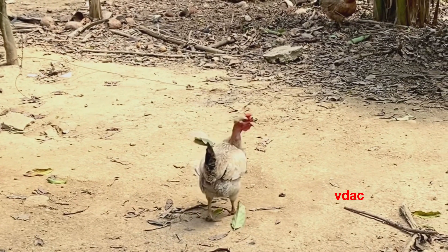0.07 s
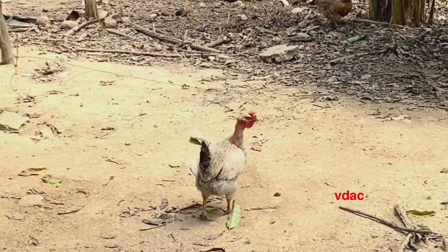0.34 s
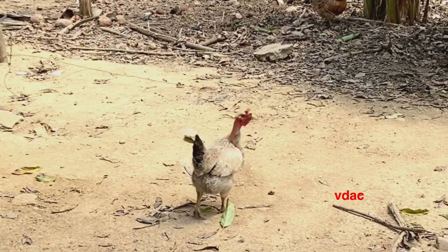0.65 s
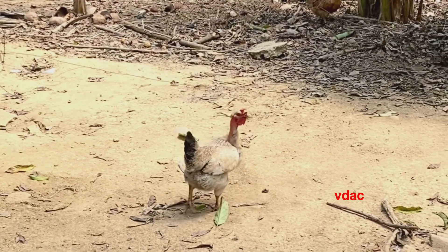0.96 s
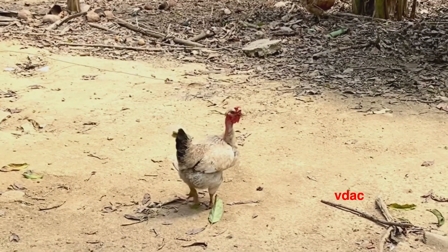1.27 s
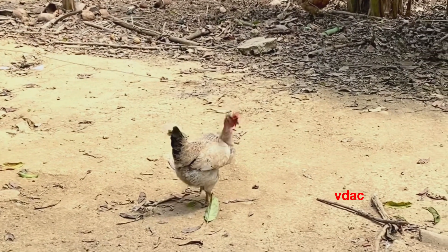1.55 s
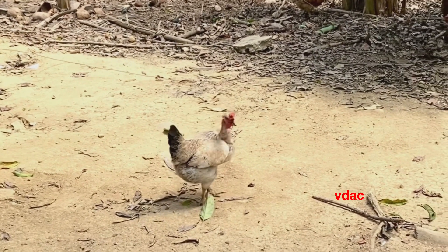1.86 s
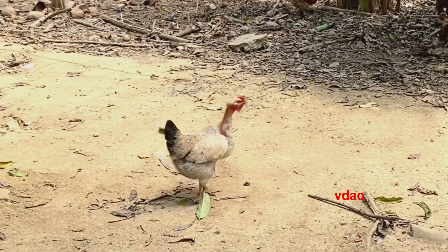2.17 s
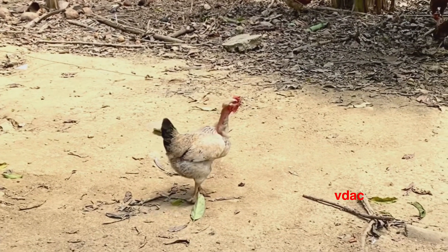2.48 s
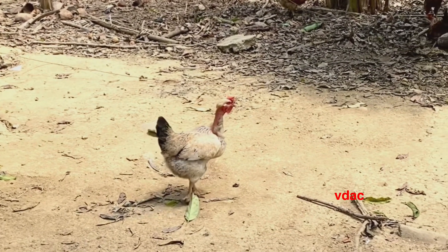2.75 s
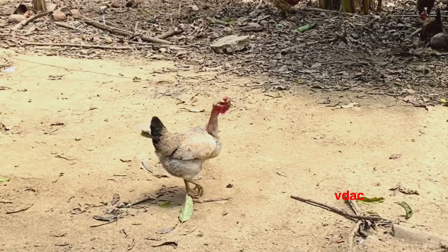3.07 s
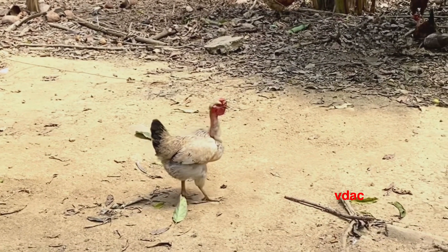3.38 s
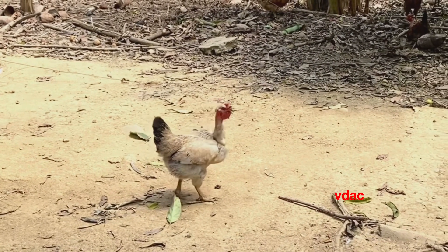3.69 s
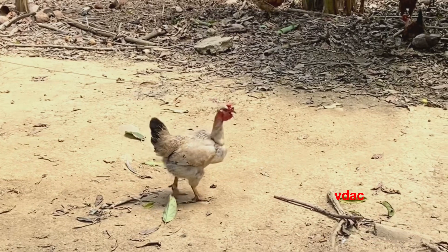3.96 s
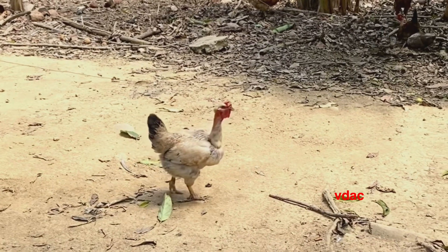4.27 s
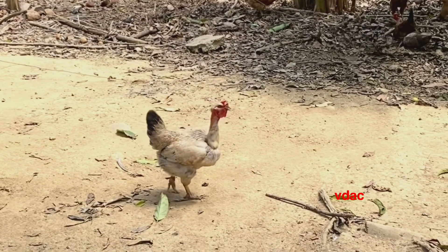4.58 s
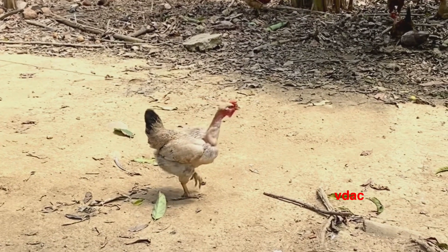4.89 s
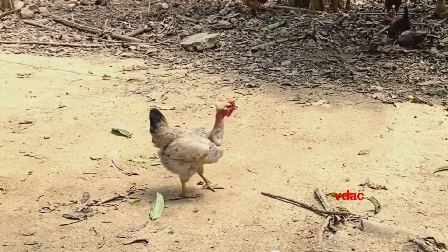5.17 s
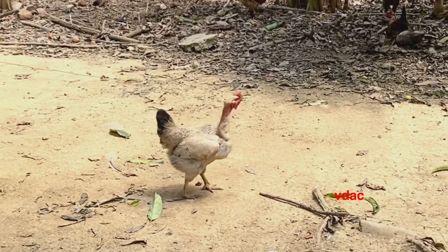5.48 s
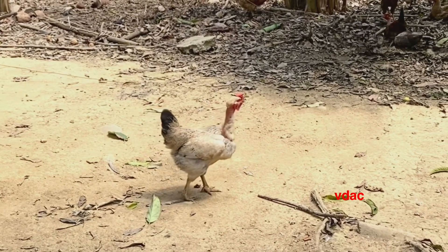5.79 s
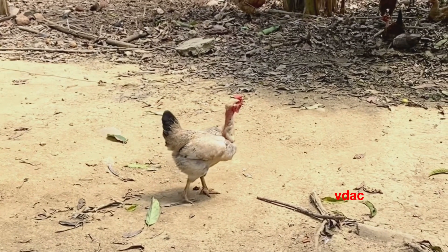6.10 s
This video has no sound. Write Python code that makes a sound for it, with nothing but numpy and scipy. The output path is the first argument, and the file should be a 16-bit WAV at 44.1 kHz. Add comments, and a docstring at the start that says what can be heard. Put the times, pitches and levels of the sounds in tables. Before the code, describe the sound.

A hen gives two loud squawks, a thin whine and a run of short clucks outdoors, with light wind on the microphone.

```python
"""A hen in a farmyard

A hen gives a rasping squawk, a run of clucks, a clear loud squawk, a thin whine and more clucks.
Each call is a pulse train from the syrinx, filtered by the throat, reflected by the hard ground and
scattered by trees. Other fowl mutter, small birds peep and a foot scuffs grit, while distant leaves
hiss and a light wind buffets the microphone."""
import sys
import numpy as np
from scipy import signal
from scipy.fft import rfft, irfft, next_fast_len
from scipy.io import wavfile
from scipy.ndimage import uniform_filter1d, map_coordinates

SR = 44100
rng = np.random.default_rng(int(sys.argv[2]) if len(sys.argv) > 2 else 0)


def master_out(mix):
    """Clip the mix to full scale and print it as 16-bit PCM to the path in sys.argv[1]."""
    frames = np.transpose(np.atleast_2d(mix))
    ceiling = np.clip(frames, -1, 1)
    pcm = np.round(ceiling * 32767).astype(np.int16)
    wavfile.write(sys.argv[1], SR, pcm)


N = 279594


def amp(db):
    """Decibels to amplitude ratio."""
    return 10 ** (np.asarray(db) / 20)

def unit(x):
    """Normalisation to rms 1."""
    return x / np.sqrt(np.mean(x ** 2) + 1e-20)

def along(points, hz):
    """Interpolation of (frequency [Hz], value) points on a logarithmic axis."""
    knots, values = np.transpose(points)
    return np.interp(np.log(hz + 1), np.log(knots + 1), values)

def curves(rows, t):
    """Linear interpolation in time of each column after the first."""
    times, *columns = np.transpose(rows)
    return [np.interp(t, times, column) for column in columns]

def wobble(rate, size):
    """Smooth random modulation: a spline through rate knots a second."""
    knots = rng.standard_normal(int(size * rate / SR) + 4)
    return map_coordinates(knots, [np.arange(size) * rate / SR])

def add(track, start, x):
    """Superposition of x on the track from start [s]."""
    part = track[max(0, round(start * SR)):][:len(x)]
    part += x[:len(part)]

def filtered(x, response):
    """Linear filtering: the spectrum times a complex frequency response."""
    n = x.shape[-1]
    padded = next_fast_len(n + 8192)
    return irfft(rfft(x, padded) * response(np.fft.rfftfreq(padded, 1 / SR)), padded)[..., :n]

def brighten(x, db, split_hz=1500):
    """High shelf: the treble above the split changes by db."""
    treble = filtered(x, lambda hz: 1 - 1 / (1 + (hz / split_hz) ** 8))
    return x + (amp(db) - 1) * treble

def stereo_noise(spectrum, coherence):
    """Partial coherence: the balance of mid and side noise sets how alike the channels are."""
    def response(hz):
        angle = np.arccos(np.clip(along(coherence, hz), -1, 1)) / 2
        return amp(along(spectrum, hz)) * [np.cos(angle), np.sin(angle)]
    mid, side = filtered(rng.standard_normal((2, N)), response)
    return unit(np.array([mid + side, mid - side]))

def foliage():
    """Incoherent sources: distant leaves merge into a nearly steady hiss."""
    # leaf noise (frequency [Hz], level [dB])
    spectrum = [(80, -23.5), (150, -7), (300, -14), (500, -10.5), (660, -13.5), (1100, -17.5),
                (2500, -23.5), (7000, -32.5), (8500, -40), (11000, -38), (13000, -55.5), (15500, -61.5)]
    # left-right likeness (frequency [Hz], coherence [0-1])
    coherence = [(60, 0.58), (150, 0.15), (380, 0.77), (950, 0.0), (2380, 0.56), (5980, 0.053),
                 (15000, 0.85)]
    return amp(-61.5 + .9 * wobble(4, N)) * stereo_noise(spectrum, coherence)

def wind(eddy_db=2.5, eddies_per_s=14):
    """Turbulent pressure: eddies and sudden puffs rumble on the microphone."""
    # breeze strength (time [s], relative level [dB])
    breeze = [(0.0, -59), (0.86, -64.5), (1.66, -49), (2.03, -52), (2.4, -59), (2.72, -61), (3.16, -62),
              (3.48, -54.5), (3.67, -64), (3.94, -67.5), (4.48, -63.5), (4.79, -58), (5.3, -63.5),
              (6.34, -58)]
    # puffs (time [s], half width [s], level [dB])
    bumps = [(1.498, 0.019, -24.5), (1.55, 0.02, -38.5), (1.725, 0.026, -41.5), (1.935, .02, -48),
             (2.03, .05, -45.5), (2.19, 0.048, -47.5), (2.75, 0.024, -44), (2.844, 0.019, -32.5),
             (3.244, 0.016, -39.5), (3.425, 0.032, -45.5), (3.575, 0.018, -42), (3.641, .018, -37),
             (4.55, 0.0098, -46), (5.66, 0.012, -46.5), (6.04, .012, -37)]
    # turbulence spectrum (frequency [Hz], level [dB])
    rumble = [(18, -44), (35, -13), (55, 1.5), (80, 1), (120, -3), (170, -6), (215, -13), (260, -17.5),
              (450, -41.5), (900, -89)]
    t = np.arange(N) / SR
    buffet = amp(curves(breeze, t)[0] + 2 + eddy_db * wobble(eddies_per_s, N))
    puffs = sum(amp(db) * np.exp(-((t - time) / width) ** 2) for time, width, db in bumps)
    return np.hypot(buffet, puffs) * stereo_noise(rumble, coherence=[(60, .78), (250, .83)])

def peeps():
    """Frequency glides: small birds whistle nearly pure tones."""
    # whistles (time [s], length [s], start pitch [Hz], end pitch [Hz], relative level [dB])
    notes = [(3.098, 0.12, 2580, 2870, -67), (3.364, 0.078, 2730, 2500, -63),
             (3.47, 0.069, 2485, 2623, -67), (3.584, 0.069, 2590, 2560, -64),
             (5.155, 0.075, 3780, 3713, -48), (5.506, 0.057, 3500, 4010, -59.5),
             (5.671, 0.056, 3990, 3890, -63), (6.071, 0.1215, 5330, 5330, -75)]
    out = np.zeros(N)
    for start, length, start_hz, end_hz, db in notes:
        progress = np.linspace(0, 1, int(length * SR))
        pitch = (start_hz + (end_hz - start_hz) * progress) * (1 + .0061 * wobble(150, len(progress)))
        arch = 2 * np.sqrt(progress * (1 - progress))
        add(out, start, amp(db) * arch * np.sin(2 * np.pi * np.cumsum(pitch) / SR))
    return out

def mutters():
    """Irregular voicing: other fowl give low, rough clucks with a slow onset."""
    # soft calls (time [s], length [s], pitch [Hz], relative level [dB])
    notes = [(0.302, 0.032, 190.9, -58), (.59, 0.025, 165.2, -57.5), (3.492, .025, 170, -61),
             (4.191, 0.043, 166.7, -55.5)]
    # throat response (frequency [Hz], gain [dB])
    colour = [(150, -12), (350, -6), (520, 9), (750, -8.5), (1200, -23), (2500, -21), (4000, -38.5),
              (10000, -47.5)]
    out = np.zeros(N)
    for start, length, pitch_hz, db in notes:
        add(out, start, amp(db) * cluck(length, pitch_hz, rough=.7, colour=colour, attack_s=.03))
    return out

def scuff(peak_s=4.765, rise_s=.018, fade_db_per_s=152):
    """Friction noise: grit under a foot swells quickly, then fades grainily."""
    # grit spectrum (frequency [Hz], level [dB])
    grit = [(1500, -13), (3500, -5.5), (5100, -3.5), (6200, -18), (14000, -35)]
    t = np.arange(N) / SR - peak_s
    stroke = np.exp(-(np.minimum(t, 0) / rise_s) ** 2) * amp(-fade_db_per_s * np.maximum(t, 0))
    return stroke * amp(-53 + 2.8 * wobble(210, N)) * stereo_noise(grit, coherence=[(4000, .43)])

def trees(x, near_db=-19, near_t60=.25, far_db=-27):
    """Reverberation: a quick scatter from the yard and a faint tail from the trees, longest in the bass."""
    # decay among the trees (frequency [Hz], reverberation time [s])
    far_t60 = [(200, 1), (1000, 0.45), (4000, 0.15), (12000, 0.14)]
    hz, t, noise = signal.stft(rng.standard_normal((2, SR // 2)), SR, nperseg=256)
    def tail(t60, db):
        decay = signal.istft(noise * amp(-60 * t / t60) * (t > .004), SR, nperseg=256)[1]
        return amp(db) * decay / np.linalg.norm(decay[0])
    response = tail(near_t60, near_db) + tail(along(far_t60, hz)[:, None], far_db)
    return signal.fftconvolve(x[None], response, axes=1)[:, :N]

def trunks(x, count=6, delays_s=(.006, .028), db=-14):
    """Multipath interference: echoes from trunks make a gliding overtone flare and fade."""
    out = np.zeros(N)
    for delay, sign in zip(rng.uniform(*delays_s, count), rng.choice([-1, 1], count)):
        add(out, delay, sign * amp(db) * x)
    return out

def ground(x, delay_s=.001038, reflection=.58, dull_hz=6000):
    """Comb filtering: a reflection off hard earth cuts notches near 0.5, 1.4, 2.4 kHz and upward."""
    return filtered(x, lambda hz: 1 + reflection * np.exp(-2j * np.pi * hz * delay_s - (hz / dull_hz) ** 2))

def throat(x, colour, size=2048):
    """Minimum-phase resonance: the windpipe rings briefly after each pulse."""
    gain = amp(along(colour, np.fft.rfftfreq(size, 1 / SR)))
    cepstrum = irfft(np.log(gain))
    cepstrum[1:size // 2] *= 2  # folding the cepstrum makes the response causal
    cepstrum[size // 2 + 1:] = 0
    ringing = irfft(np.exp(rfft(cepstrum)))
    return signal.fftconvolve(x, ringing)[:len(x)]

def syrinx(pitch, rough, slip=0, jitter=.083, shimmer_db=8):
    """Pulsed airflow: one pulse a cycle; roughness adds jitter, shimmer and hiss at each opening."""
    n, rough = len(pitch), np.clip(rough, 0, 1)
    cycles = np.cumsum(pitch * (1 + jitter * rough * wobble(350, n))) / SR + slip - .3
    offset = cycles - np.round(cycles)
    lag = offset * SR / pitch  # samples from the nearest pulse
    pulses = unit(np.sinc(.8 * lag) * np.exp(-(lag / 10) ** 2))
    hiss = filtered(rng.standard_normal(n), lambda hz: np.sqrt(hz / (hz + 5000)))
    breath = unit(hiss * np.exp(-(offset / .16) ** 2))
    leak = .6 * rough + .025
    return pulses * amp(shimmer_db * rough * wobble(400, n)) + leak * breath

def cluck(length, pitch_hz, rough, colour, attack_s=.0041, release_s=.0062, scoop=.15, sag=.17):
    """Pressure-driven voicing: pitch and treble arch, and the voice breaks up as pressure runs out."""
    t = np.arange(int((length + .03) * SR)) / SR
    starting = np.exp(-t / .011)
    ending = np.clip((t - length) / .024 + 1, 0, 1)
    release = np.exp(-np.maximum(t - length, 0) / release_s)
    pressure = (1 - np.exp(-t / attack_s)) * amp(-6 * ending ** 2) * release
    bend = 1 - sag * ending ** 3 - scoop * starting + .013 * wobble(50, len(t))
    pulses = syrinx(pitch_hz * bend, rough + .22 * ending ** 2 + .25 * starting, shimmer_db=3)
    effort = np.sin(np.pi * np.minimum(t / (length + .0066), 1) ** .67)
    voice = brighten(ground(throat(pressure * pulses, colour)), db=9 * (effort - .8))
    return unit(voice) * np.sqrt(len(t) / (length * SR))

def clucks():
    """Formant shift: in the hen's short calls a wider mouth lifts the throat's resonances."""
    # clucks (time [s], length [s], pitch [Hz], level [dB], treble [dB], roughness [0-1], mouth [ratio])
    notes = [(.861, 0.041, 252.3, -38, 4.5, .1, .99), (1.15, 0.046, 273.1, -36.5, 5.5, .3, 1.007),
             (1.366, 0.048, 289.2, -33.5, 5.5, 0.2, 0.96), (1.763, 0.057, 294.8, -34.5, 5, 0.5, 0.98),
             (2.05, 0.05, 281.5, -34, 1.5, 0.3, 1.014), (2.331, 0.062, 298.5, -33.5, 2.5, 0.2, 0.99),
             (2.762, 0.058, 280.8, -35.5, 3, .35, 1.035), (2.986, 0.061, 335, -33, 6.5, .7, 1.053),
             (3.224, 0.055, 419.5, -33, 6.5, .7, 1.053), (3.682, .056, 276.5, -34, 7.5, 0.8, 1.01),
             (4.712, .037, 257.8, -39, 6, .5, 0.965), (4.928, 0.044, 253.2, -37.5, -0.5, 0.5, 1),
             (5.365, 0.035, 246.4, -40, 5.5, 0.3, 0.99), (5.579, 0.054, 273.7, -36.5, 7, 0.2, 0.98),
             (5.847, 0.054, 394.6, -37, -0.5, 0.7, 1.11)]
    # throat response, beak ajar (frequency [Hz], gain [dB])
    beak_ajar = [(30, -50), (120, -27.5), (280, -12), (420, -12), (640, -5.5), (850, 5), (1000, 0.5),
                 (1190, 4), (1500, -16), (1900, -17), (2550, -38), (3100, -30), (3450, -25), (3850, -21.5),
                 (5000, -46), (5900, -38.5), (6800, -46), (8000, -45), (11000, -47), (15000, -55)]
    out = np.zeros(N)
    for start, length, pitch_hz, db, treble_db, rough, mouth in notes:
        colour = np.multiply(beak_ajar, (mouth, 1))
        add(out, start, amp(db) * brighten(cluck(length, pitch_hz, rough, colour), treble_db))
    return out

def long_call(contour, states, colour, start_ratio, attack_s=.008, release_s=.004):
    """Sidebands: a slower membrane modulates the pulses, locking to half the pitch as the voice settles."""
    start, end = contour[0][0], contour[-1][0]
    t = np.arange(max(start - attack_s, 0), end + 10 * release_s, 1 / SR)
    pitch, db, treble_db = curves(contour, t)
    # the call starts hoarse, settles into a clean note, then breaks up
    settle_s, break_s, *grain = states
    settled = .5 + .5 * np.tanh((t - settle_s) / .0096)
    broken = .5 + .5 * np.tanh((t - break_s) / .004)
    weights = np.array([1 - settled, settled * (1 - broken), broken])
    rough, rasp = np.reshape(grain, (2, -1)) @ weights
    ratio = start_ratio + (.5 - start_ratio) * settled
    membrane_hz = pitch * ratio * (1 + .3 * rough * wobble(100, len(t)))
    tug = rasp * np.sin(2 * np.pi * np.cumsum(membrane_hz) / SR)
    pulses = syrinx(pitch * (1 + .003 * wobble(70, len(t))), rough, slip=.094 * tug)
    voice = brighten(ground(throat(pulses * (1 + .5 * tug), colour)), treble_db)
    running_rms = np.sqrt(np.abs(uniform_filter1d(voice ** 2, size=600)) + 1e-12)
    gate = np.clip(1 + (t - start) / attack_s, 0, 1) ** 2 * np.exp(-np.maximum(t - end, 0) / release_s)
    out = np.zeros(N)
    add(out, t[0], amp(db) * gate * voice / running_rms)
    return out

def whine():
    """Interference: a soft call through the shut beak mingles with its echoes from the trunks."""
    # course of the call (time [s], pitch [Hz], relative level [dB], treble [dB])
    contour = [(4.323, 435, -43, 2), (4.342, 445.7, -38.5, -3.5), (4.368, 470.8, -43.5, 0.5),
               (4.445, 463, -46.5, -1), (4.47, 470.6, -45, 1), (4.52, 497.2, -44.5, 5),
               (4.545, 512.6, -42, -16), (4.563, 493, -42, -9)]
    # voice states (settles [s], breaks [s], 3 x roughness [0-1], 3 x rasp [0-1]): start, held, end
    states = (4.364, 4.533, 0.91, .025, 0.69, .4, 0.022, 0.5)
    # throat response, beak shut (frequency [Hz], gain [dB])
    beak_shut = [(250, -13.5), (470, 3.5), (750, 7), (1100, -6.5), (1750, 2.5), (2400, -9), (3050, -10),
                 (3550, -22), (3980, -10.5), (4550, -27), (5180, -10), (5700, -26), (6800, -21),
                 (9000, -24.5), (14000, -42)]
    call = long_call(contour, states, beak_shut, start_ratio=.31)
    return amp(-1) * (call + trunks(call))

def squawks():
    """Source and filter: two loud calls, rasping through an open beak and clear through a wide one."""
    # course of each call (time [s], pitch [Hz], level [dB], treble [dB])
    rasping = [(.01, 495, -21.5, -2), (.03, 558.8, -17.5, 7), (.06, 534.5, -19, 5), (.115, 542.6, -18.5, 4),
               (.155, 498.5, -18, -9), (.19, 490, -19.5, -9.5), (.208, 432.2, -26, 0.5),
               (.235, 330.8, -26.5, -6), (.259, 302, -29, -0.5)]
    clear = [(3.779, 561, -19.5, 6.5), (3.825, 536.7, -16.5, 4), (3.895, 530, -16.5, 5.5),
             (3.95, 519.3, -15.5, -5), (3.985, 511, -19.5, -3), (4.011, 506.7, -24, -1)]
    # voice states (settles [s], breaks [s], 3 x roughness [0-1], 3 x rasp [0-1]): start, held, end
    rasping_states = (.15, .195, 0.23, .05, .25, 0.68, 0.17, 0.21)
    clear_states = (3.798, 4.014, .35, .035, .15, 0.24, 0.048, .08)
    # throat responses (frequency [Hz], gain [dB])
    beak_open = [(30, -50), (250, -30.5), (380, -14.5), (650, -16), (880, -1), (1250, 4), (1460, -15),
                 (1640, -15.5), (1780, -20), (2150, -12.5), (2400, -26.5), (2950, -20), (4000, -24),
                 (5300, -31), (8500, -44), (15000, -50)]
    beak_wide = [(250, -44.5), (530, -18), (750, -11), (1050, 0.5), (1600, -16.5), (2130, -15),
                 (2650, -26.5), (3200, -20), (3750, -31.5), (5300, -35.5), (6500, -39.5), (8500, -54.5),
                 (10000, -46), (15000, -51)]
    return (long_call(rasping, rasping_states, beak_open, start_ratio=.335)
            + long_call(clear, clear_states, beak_wide, start_ratio=.5))

def scene():
    """Direct and diffuse sound: the hen faces away, so her treble scatters; farther birds echo more."""
    # the hen's level difference (frequency [Hz], left over right [dB])
    tilt = [(500, 0), (780, 0), (950, 2), (1100, 4), (1790, 1.5), (2740, -1), (4190, -1), (6400, 3),
            (9800, 0)]
    # her phase difference (frequency [Hz], left lead [rad])
    lead = [(100, 0), (600, .75), (1200, .85), (2100, .3), (3200, .9), (4900, 1.7), (8000, 1.5),
            (13000, 2.2)]
    hen = squawks() + whine() + clucks()
    others = mutters() + peeps()
    sides = np.array([[.5], [-.5]])
    direct = filtered(hen, lambda hz: amp(sides * along(tilt, hz)) * np.exp(1j * sides * along(lead, hz)))
    # her beak beams the upper overtones into the trees, whose leaves absorb a little of the very top
    beamed = brighten(hen, db=12.5, split_hz=2010)
    beamed = brighten(beamed, db=-.5, split_hz=6500)
    scattered = trees(beamed + amp(13) * others)
    return direct + amp(-2.5) * others + scattered + wind() + foliage() + scuff()

def record(dry):
    """Band limiting: an ideal low-pass filter passes nothing above 15.9 kHz."""
    return filtered(dry, lambda hz: hz < 15900)


dry = scene()
out = record(dry)
master_out(out)
```